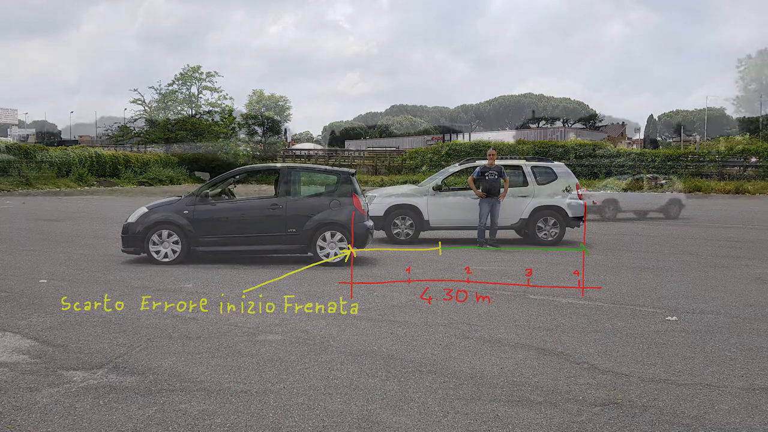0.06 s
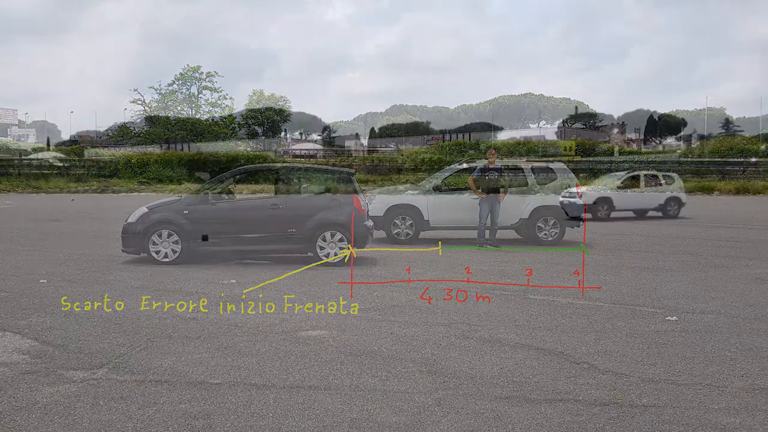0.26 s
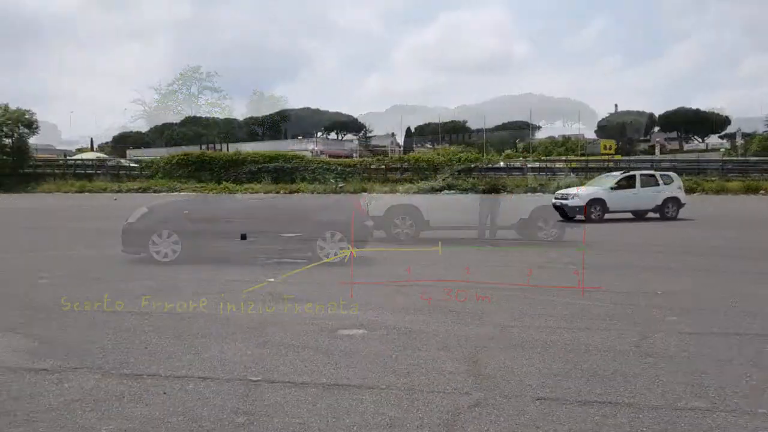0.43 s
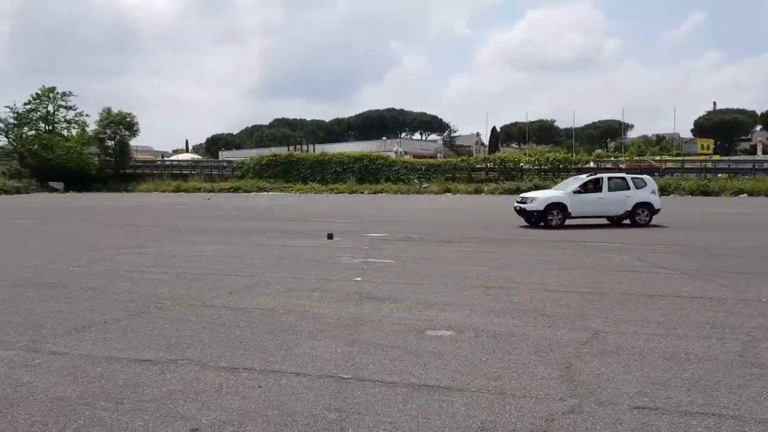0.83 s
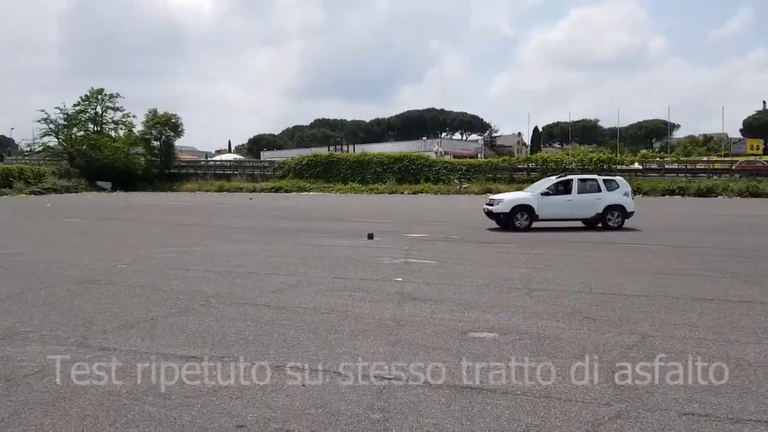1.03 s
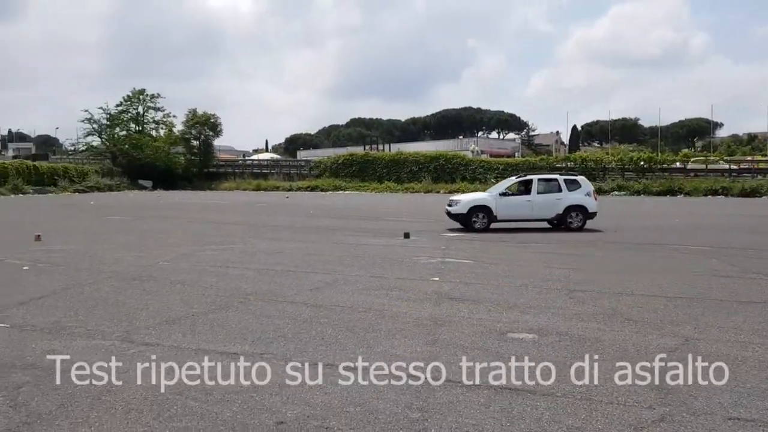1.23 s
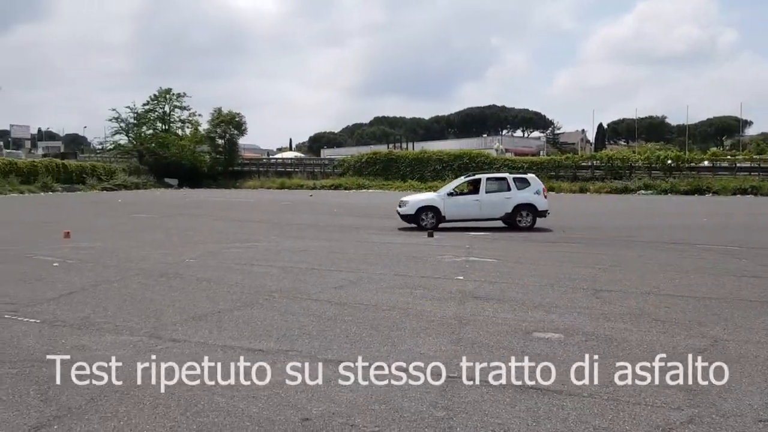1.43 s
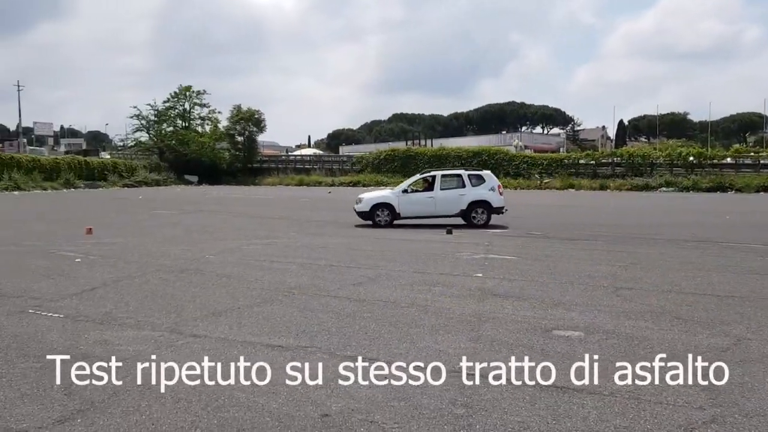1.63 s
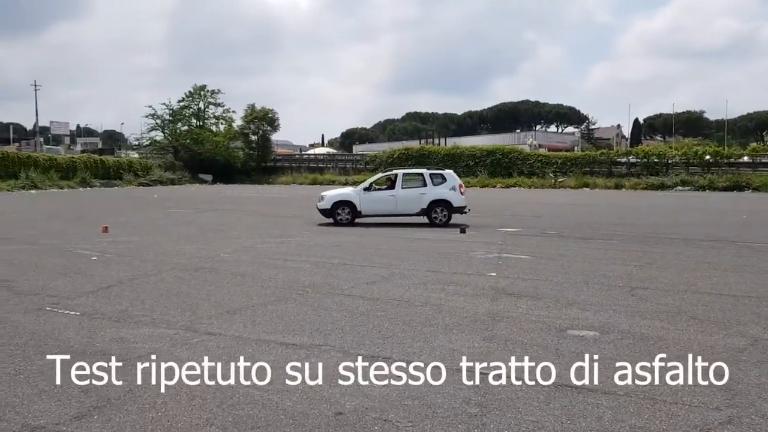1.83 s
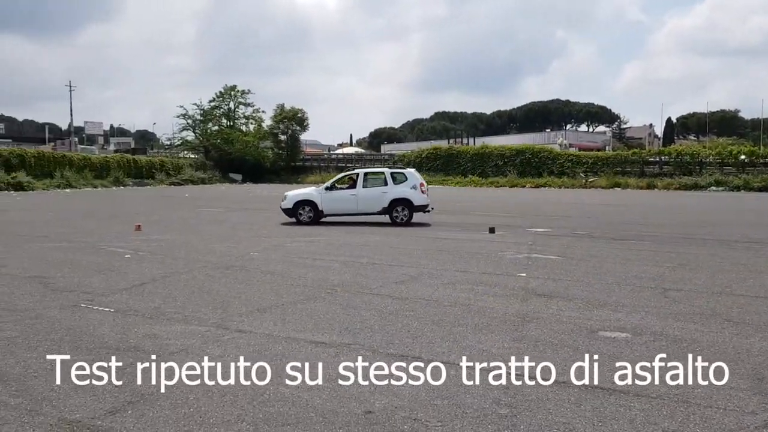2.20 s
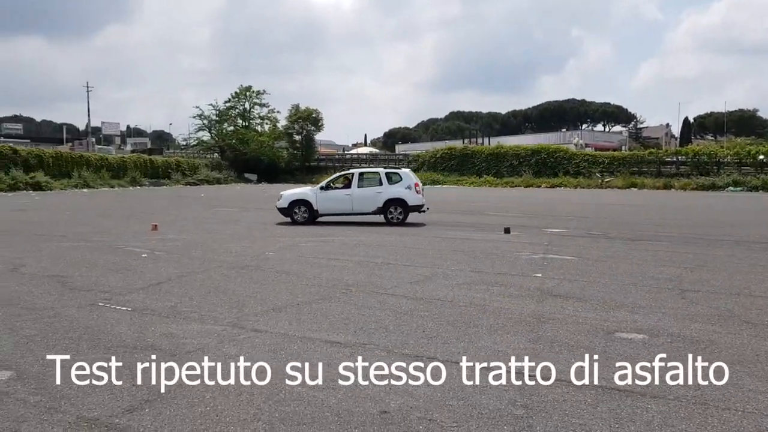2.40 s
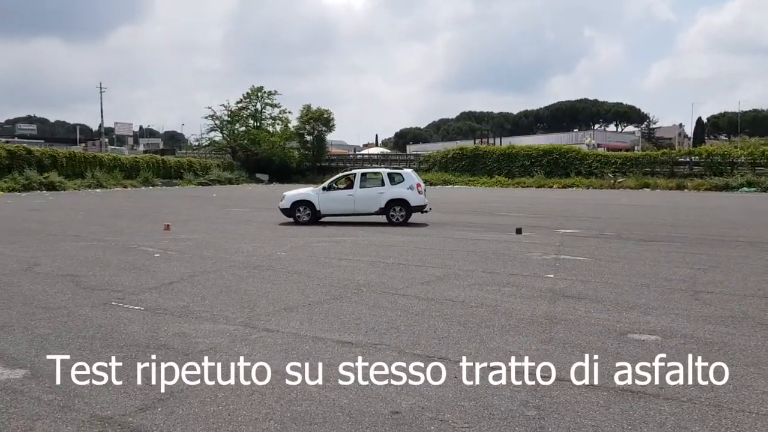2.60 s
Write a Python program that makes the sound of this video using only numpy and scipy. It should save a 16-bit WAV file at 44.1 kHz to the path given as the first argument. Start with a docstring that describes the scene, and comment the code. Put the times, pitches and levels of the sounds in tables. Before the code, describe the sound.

A car rolls across an open asphalt lot, its tyres roaring and hissing while wind rumbles on the microphone. It then brakes hard, the tyres groaning and rasping in short bursts, ending with a hum and thin brake squeaks.

```python
"""After a moment of silence, wind rumbles and thumps on the microphone while a car rolls across an
open asphalt lot, its tread roaring and hissing. Grit ticks and the brakes squeak thinly. From 1.5 s
the car brakes hard: in short bursts the slipping tyres groan, ring, rasp and throw sand.
Wind and rolling fade, the car's broad hum swells, and the brakes give a few last squeaks."""
import sys
import numpy as np
from scipy.fft import rfft, irfft, next_fast_len
from scipy.io import wavfile
from scipy.ndimage import map_coordinates

SR = 44100
rng = np.random.default_rng(int(sys.argv[2]) if len(sys.argv) > 2 else 0)


def master(y):
    """Save y as 16-bit WAV."""
    cut = np.clip(np.atleast_2d(y).T, -1, 1)
    pcm = np.round(cut * 32767)  # scale
    wavfile.write(sys.argv[1], SR, pcm.astype(np.int16))


N = 121275

# wind and thumps, left-right correlation: f/Hz, correlation
WIND_CORRELATION = [(40, 0.46), (130, 0.62), (250, 0.83)]


def tyre_scrub(slips_per_s=2000, slip_share=0.43, judder_hz=130.3, judder_db=1.5, rasp_lag_s=0.00003):
    """Bursts swell and let go: slips ring the tyres, rasp on the asphalt and throw sand."""
    # bursts: peak t/s, rise/s, fall/s, groan/dB, ring/dB, rasp/dB, sand/dB
    bursts = [(1.561, 0.018, 0.066, -34, -30, -35.5, -54), (1.681, 0.024, 0.039, -20.5, -21, -31.5, -39),
              (1.83, 0.029, 0.042, -23, -24, -30, -40), (1.852, 0.0052, 0.004, -19.5, -25, -46, -53),
              (1.877, 0.012, 0.0072, -33, -25.5, -36, -48), (1.895, 0.011, 0.019, -20.5, -24.5, -33, -38),
              (2.086, 0.057, 0.031, -35.5, -32.5, -39.5, -58), (2.286, 0.07, 0.13, -37, -32.5, -37.5, -51),
              (2.424, 0.047, 0.033, -27, -22.5, -29, -63), (2.454, 0.02, .008, -32, -27.5, -31, -44)]
    # tyre resonances: f/Hz, width/Hz, level/dB
    groan_modes = [(557, 260, 0)]
    ring_modes = [(908, 123, -4.5), (1190, 153, -8.5), (1650, 170, -12.5), (1985, 94, -9)]
    # spectra: f/Hz, level/dB
    groan_skirt = [(80, -5), (230, 5), (390, -10), (470, 1.5), (660, 0), (900, -3), (2000, -42)]
    ring_skirt = [(200, -16), (550, -27), (780, 3), (1300, 4.5), (1500, -3), (1700, 2), (2100, -5.5),
                  (2400, -16), (3200, -37), (8000, -9.5)]
    rasp_spectrum = [(900, -28), (2000, 8), (3000, 11.5), (4300, 8), (5200, 2.5), (6500, -15), (10000, -35),
                     (16000, -45)]
    sand_spectrum = [(2500, -11), (5500, 8.5), (8000, -1), (11500, -2), (14000, -7), (16000, -27)]
    # left-right: f/Hz, correlation
    correlation = [(200, 0.88), (550, 1), (1200, 0.93), (1700, 0.82), (2600, 0.13), (4000, 0.98),
                   (6000, 0.66), (14000, .1)]
    t, power = clock(), np.zeros((4, N))
    for peak_s, rise_s, fall_s, *levels_db in bursts:
        swell = np.exp(-np.maximum((peak_s - t) / rise_s, (t - peak_s) / fall_s))
        power += np.outer(amp(levels_db), swell) ** 2
    rub = lambda: friction(slips_per_s, slip_share)
    groan = stereo(resonate(rub(), groan_modes), groan_skirt, correlation)
    ring = stereo(resonate(rub(), ring_modes), ring_skirt, correlation)
    rasp = stereo(rub(), rasp_spectrum, correlation, rasp_lag_s)
    sand = stereo(rub(), sand_spectrum, correlation)
    scrub = sum(gain * layer for gain, layer in zip(np.sqrt(power), (groan, ring, rasp, sand)))
    return amp(judder_db * wobble(judder_hz)) * scrub


def tyre_roll(grains_per_s=460, grain_share=0.14, roar_lag_s=0.00007, hiss_lag_s=0.00017):
    """The tread roars and flicks hissing grains, off to the right, fading as the car slows."""
    # envelopes: t/s, roar/dB, hiss/dB
    levels = [(.21, -31.5, -45), (.5, -33.5, -45), (.8, -31, -41.5), (1.07, -32, -44.5), (1.19, -32.5, -47),
              (1.3, -32.5, -51.5), (1.41, -35.5, -48), (1.52, -32, -45), (1.98, -37, -47.5),
              (2.2, -41, -50), (2.55, -39, -47.5), (2.75, -47.5, -53.5)]
    # spectra: f/Hz, level/dB
    roar_spectrum = [(80, -16), (250, 1.5), (420, -5), (600, -0.5), (900, -2.5), (1450, -9), (1800, -8.5),
                     (2600, -17), (5000, -25), (9000, -50)]
    hiss_spectrum = [(1000, -34), (2500, 0), (3300, 1.5), (4700, -1.5), (6000, -3.5), (7500, -10.5),
                     (9500, -12.5), (12000, -12), (14000, -19), (16000, -32)]
    # left-right: f/Hz, correlation
    correlation = [(300, 0.83), (800, 0.78), (1400, 0.57), (2200, 0.26), (3400, 0.35), (4300, 0.99),
                   (5500, 0.087), (14000, 0.092)]
    roar_db, hiss_db = envelopes(levels)
    roar = stereo(white(), roar_spectrum, correlation, roar_lag_s)
    hiss = stereo(friction(grains_per_s, grain_share), hiss_spectrum, correlation, hiss_lag_s)
    return amp(roar_db) * roar + amp(hiss_db) * hiss


def grit(correlation=0.067):
    """Grit crunches in short dry ticks, some brighter than others."""
    # ticks: t/s, level/dB, rise and fall/s, treble over body/dB
    ticks = [(0.641, -26.5, 0.00092, 1), (0.649, -45, 0.0033, 9), (1.043, -33, 0.00087, -2),
             (1.068, -42, 0.0055, -2), (1.2168, -23, .0015, -8.5), (1.2503, -31.5, 0.0029, -2.5),
             (1.275, -47, 0.034, 7), (1.732, -31, 0.0023, 0), (1.766, -34, 0.0061, -2),
             (1.772, -27, 0.00053, -10), (1.92, -34, .001, -1), (2.237, -45, .006, 0), (2.45, -32, .001, 0),
             (2.522, -39.5, 0.0025, -2)]
    # spectra: f/Hz, level/dB
    body_spectrum = [(600, -5), (1300, -3), (1700, 17), (2200, -6), (3000, -11), (4600, 0), (6500, -6.5),
                     (9000, -57), (16000, -35)]
    treble_spectrum = [(3000, -13), (7000, -1), (9000, 3), (13000, -1), (15500, 3.5)]
    body = stereo(white(), body_spectrum, [(1000, correlation)])
    treble = stereo(white(), treble_spectrum, [(1000, correlation)])
    out = np.zeros((2, N))
    for peak_s, level_db, tau_s, tilt_db in ticks:
        envelope = amp(level_db) * np.exp(-np.abs(clock() - peak_s) / tau_s)
        out += envelope * (amp(-tilt_db / 2) * body + amp(tilt_db / 2) * treble)
    return out


def brake_squeaks(waver_depth_hz=102, waver_per_s=700):
    """The brakes squeak in thin, unsteady, gliding tones."""
    # squeaks: peak t/s, sigma/s, f/Hz, glide/(Hz/s), level/dB
    squeaks = [(1.172, 0.01, 4940, -2000, -45.5), (1.4055, 0.0024, 4920, 0, -39),
               (2.342, 0.011, 5050, -5000, -44), (2.672, .016, 5150, -9000, -52),
               (2.697, 0.0055, 5080, 6002.5, -43), (2.712, 0.0065, 4900, -42000, -40.5)]
    out = np.zeros(N)
    for peak_s, sigma_s, hz, glide_hz_per_s, level_db in squeaks:
        pitch_hz = hz + glide_hz_per_s * (clock() - peak_s) + waver_depth_hz * wobble(waver_per_s)
        tone = np.sqrt(2) * np.sin(2 * np.pi * np.cumsum(pitch_hz) / SR)
        out += amp(level_db) * gaussian(peak_s, sigma_s) * tone
    return out


def car_hum():
    """The car's broad hum, off to one side, swells in the second half."""
    # envelope: t/s, level/dB
    levels = [(1.4, -41), (2.1, -35.5), (2.55, -35), (2.75, -37)]
    # hum: f/Hz, level/dB
    spectrum = [(50, -25), (270, 5), (420, -6), (640, -0.5), (1100, -3), (2000, -5.5), (3000, -17.5),
                (4700, -13.5), (7000, -61), (16000, -43)]
    # left-right: f/Hz, correlation
    correlation = [(300, 0.7), (600, 0.54), (1000, -0.8), (1500, -0.74), (2300, 0.52), (5500, 0.34),
                   (9000, -0.66), (14000, -0.34)]
    level_db, = envelopes(levels)
    return amp(level_db) * stereo(white(), spectrum, correlation)


def wind(lump_db=0.5, lumps_per_s=35):
    """Wind on the microphone: a lumpy low rumble that eases off."""
    # envelope: t/s, level/dB
    levels = [(.21, -31), (.45, -30), (.68, -33), (.83, -29.5), (.95, -35), (1.15, -32.5), (1.29, -36),
              (1.39, -33.5), (1.5, -39), (1.88, -47), (1.98, -34.5), (2.08, -43.5), (2.2, -39.5),
              (2.75, -44.5)]
    # rumble: f/Hz, level/dB
    spectrum = [(20, -32), (30, -13), (42, -12), (60, -2.5), (92, -0.5), (118, 0.5), (135, -4), (160, -3),
                (250, -6), (400, -25), (900, -30.5), (3000, -52)]
    level_db, = envelopes(levels)
    lumps = amp(lump_db * wobble(lumps_per_s))
    return amp(level_db) * unit_rms(lumps * stereo(white(), spectrum, WIND_CORRELATION))


def thumps():
    """Brief dull bumps stand out of the rumble."""
    # bumps: peak t/s, level/dB, sigma/s, f/Hz
    bumps = [(0.442, -18.5, 0.0037, 176), (0.595, -28.5, 0.0082, 109), (0.669, -25.5, 0.011, 91),
             (1.377, -19, .002, 234), (1.425, -30, 0.006, 267), (1.688, -30.5, 0.0067, 210),
             (1.964, -34.5, 0.019, 158), (2.293, -26, 0.0041, 220)]
    # spectrum: ratio to the bump's f, level/dB
    shape = [(.25, -61), (.6, 4.5), (1, 2.5), (1.5, 1.5), (2.5, -35), (8, -52)]
    out = np.zeros((2, N))
    for peak_s, level_db, sigma_s, hz in bumps:
        spectrum = [(hz * ratio, db) for ratio, db in shape]
        out += amp(level_db) * gaussian(peak_s, sigma_s) * stereo(white(), spectrum, WIND_CORRELATION)
    return out


def friction(snaps_per_s, share):
    """Random snaps carry a share of the power, a smooth rub the rest."""
    snaps = unit_rms(white() * (rng.random(N) < snaps_per_s / SR))
    return np.sqrt(share) * snaps + np.sqrt(1 - share) * white()


def resonate(x, modes):
    """x drives damped resonances in parallel."""
    return filtered(x, lambda f: sum(amp(db) * 1j * f * width / (hz * hz - f * f + 1j * f * width)
                                     for hz, width, db in modes))


def stereo(pair, spectrum, correlation, lag_s=0):
    """Two independent signals to coloured left and right at rms 1, left lag_s late."""
    angle = lambda hz: np.arccos(np.clip(log_interp(correlation, hz), -.99, .99)) / 2
    response = lambda hz: amp(log_interp(spectrum, hz)) * [np.cos(angle(hz)), np.sin(angle(hz))]
    mid, side = filtered(pair, response)
    ears = np.array([mid + side, mid - side])
    if lag_s:
        ears = filtered(ears, lambda hz: np.exp(1j * np.pi * lag_s * np.outer([-1, 1], hz)))
    return unit_rms(ears)


def filtered(x, response):
    """Apply a complex frequency response."""
    size = next_fast_len(N + SR // 2)
    return irfft(rfft(x, size) * response(np.fft.rfftfreq(size, 1 / SR)), size)[..., :N]


def envelopes(rows):
    """Per-sample curve for each column after t/s."""
    times_s, *columns = np.transpose(rows)
    return [np.interp(clock(), times_s, column) for column in columns]


def log_interp(points, hz):
    """Interpolate (f/Hz, value) points over log frequency."""
    knots_hz, values = np.transpose(points)
    return np.interp(np.log(hz + 1), np.log(knots_hz + 1), values)


def wobble(knots_per_s):
    """Smooth random curve."""
    return map_coordinates(rng.standard_normal(N // 8), [clock() * knots_per_s], mode="wrap")


def gaussian(peak_s, sigma_s):
    return np.exp(-((clock() - peak_s) / sigma_s) ** 2 / 2)


def white():
    return rng.standard_normal((2, N))


def amp(db):
    return 10 ** (np.asarray(db) / 20)


def unit_rms(x):
    return x / np.sqrt(np.mean(x ** 2) + 1e-20)


def clock():
    return np.arange(N) / SR


def scene():
    """Wind and the car in open air."""
    return car_hum() + wind() + thumps() + tyre_roll() + tyre_scrub() + grit() + brake_squeaks()


def record(dry, reflection_s=0.002339, reflection_gain=0.15, start_s=0.2105, cutoff_hz=16000):
    """A close reflection ripples the spectrum; the sound cuts in and is band-limited."""
    # channel balance: f/Hz, left minus right/dB
    balance = [(40, -5), (80, 2), (150, 0), (400, 1), (1200, 0.8), (3000, -1.4), (5500, -1.8),
               (15000, -1.5)]
    comb = lambda hz: 1 + reflection_gain * np.exp(-2j * np.pi * hz * reflection_s)
    pan = lambda hz: amp(np.outer([.5, -.5], log_interp(balance, hz)))
    coloured = filtered(dry, lambda hz: comb(hz) * pan(hz))
    return filtered(coloured * (clock() >= start_s), lambda hz: hz < cutoff_hz)


dry = scene()
out = record(dry)
master(out)
```